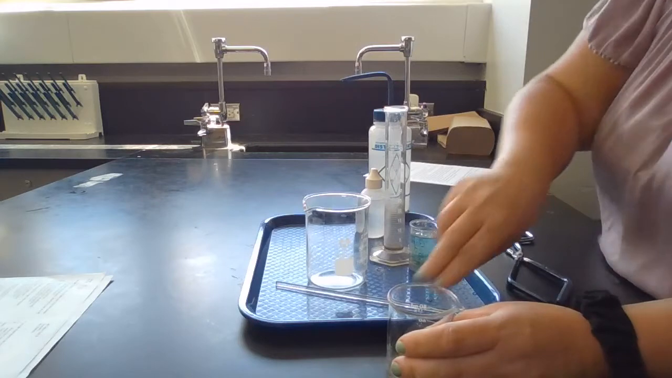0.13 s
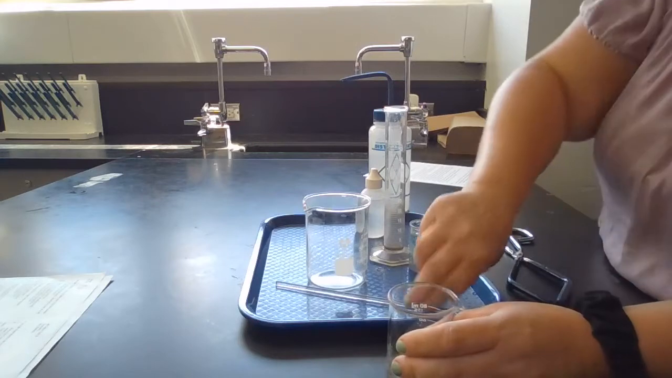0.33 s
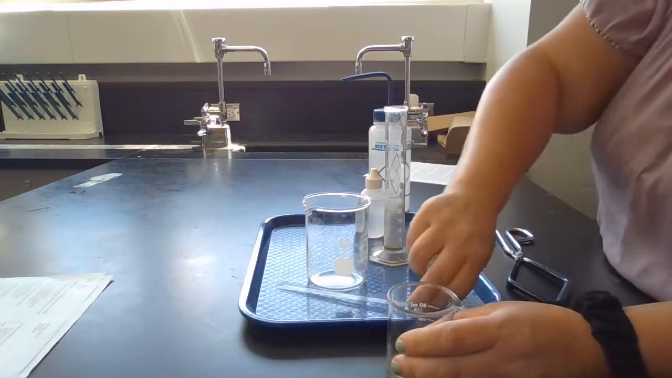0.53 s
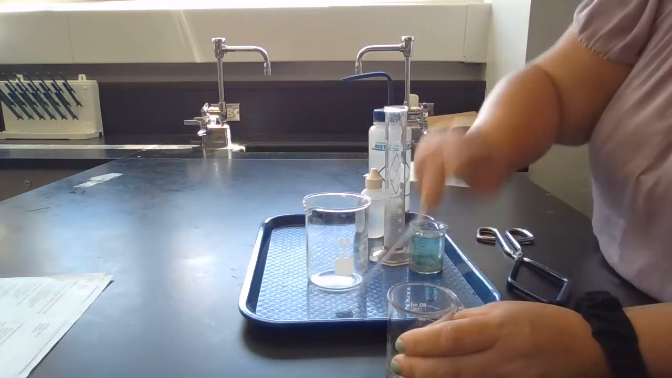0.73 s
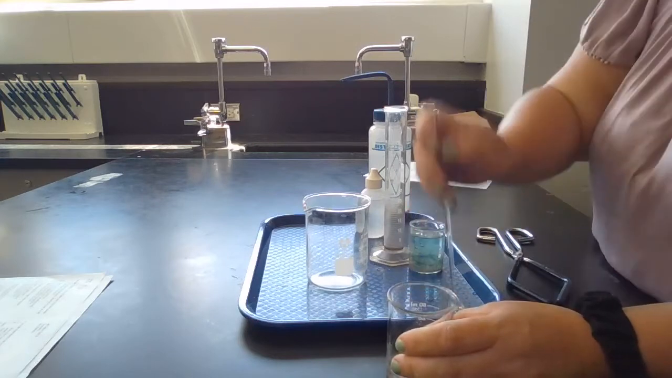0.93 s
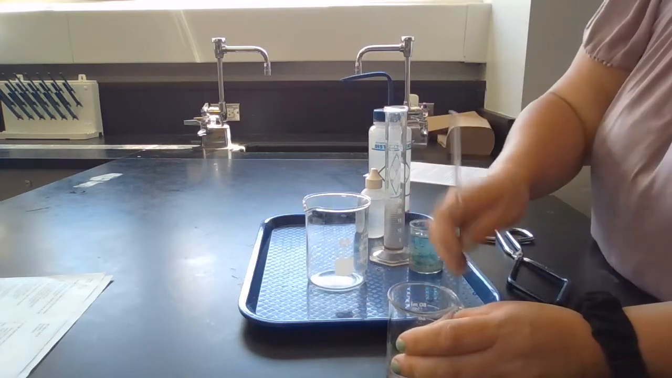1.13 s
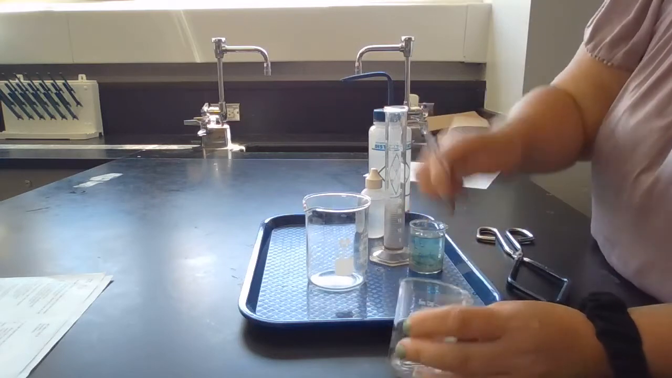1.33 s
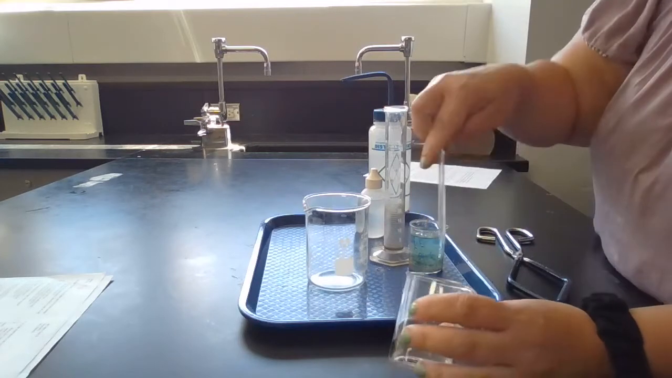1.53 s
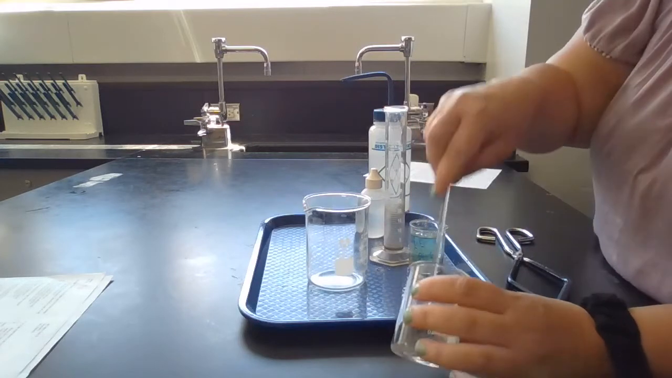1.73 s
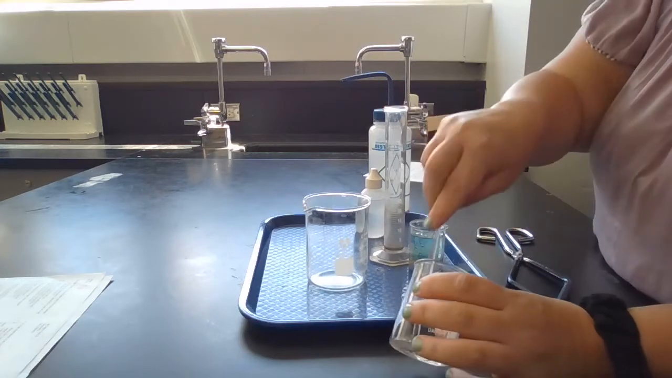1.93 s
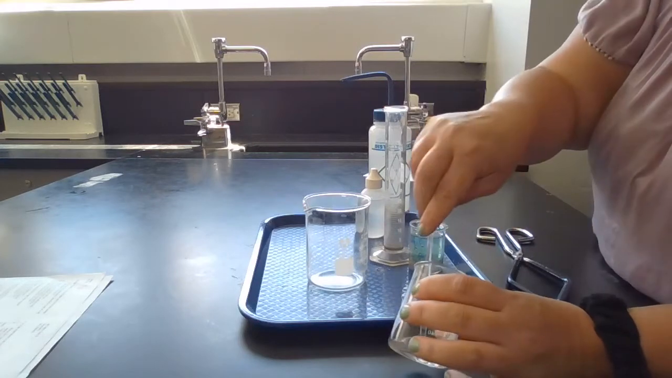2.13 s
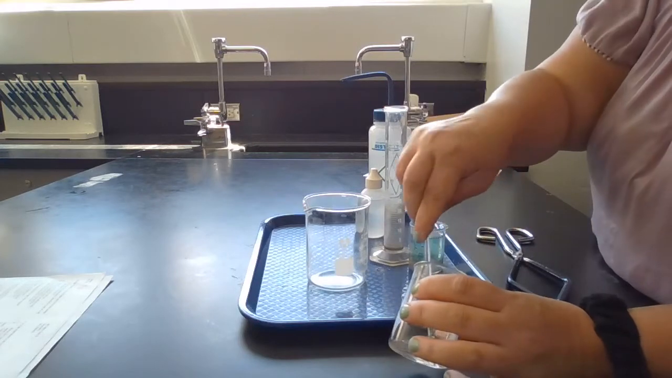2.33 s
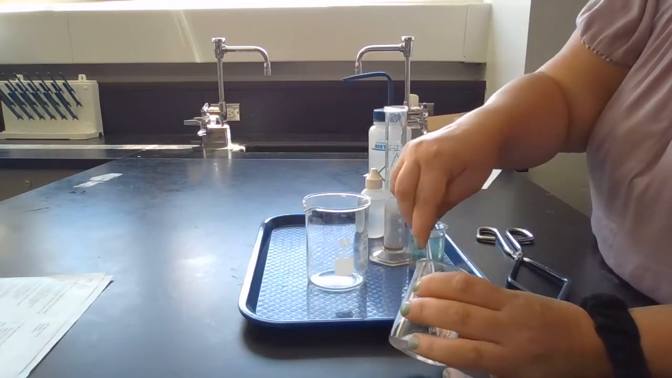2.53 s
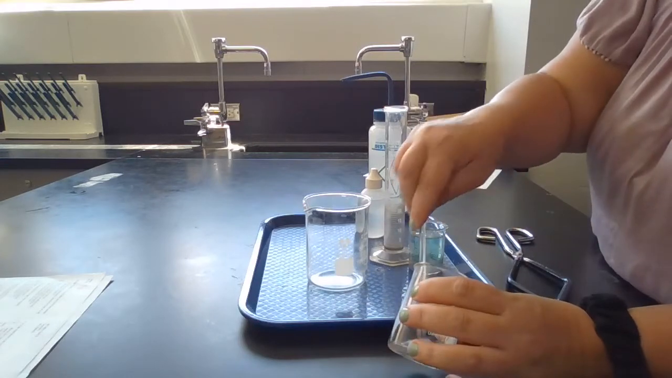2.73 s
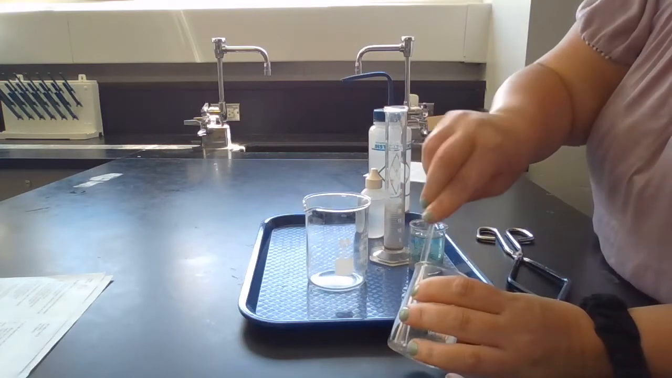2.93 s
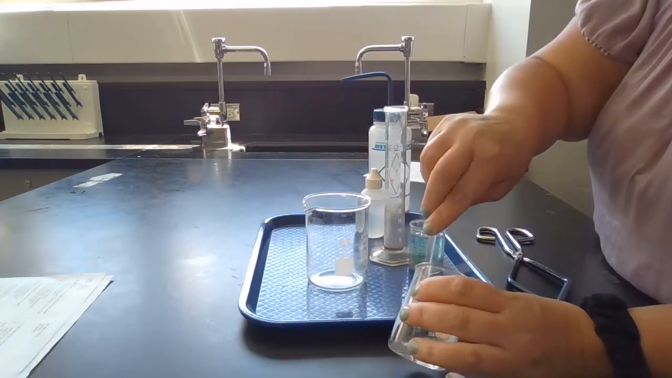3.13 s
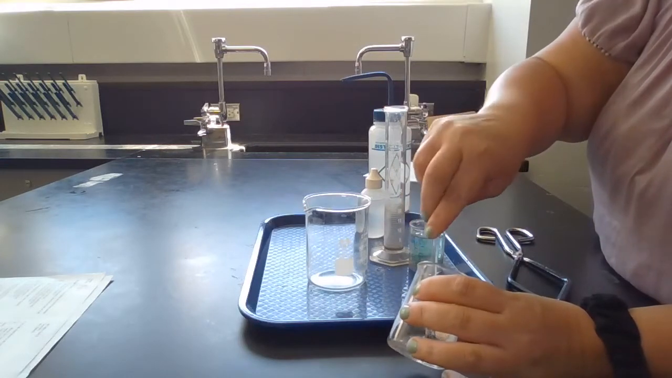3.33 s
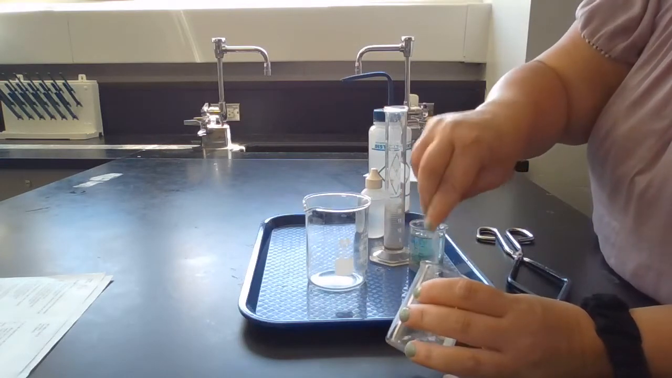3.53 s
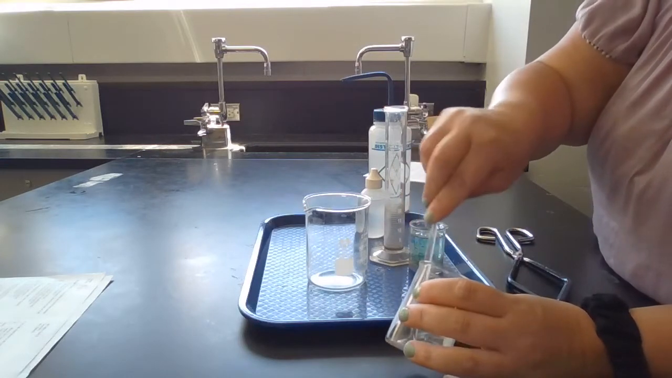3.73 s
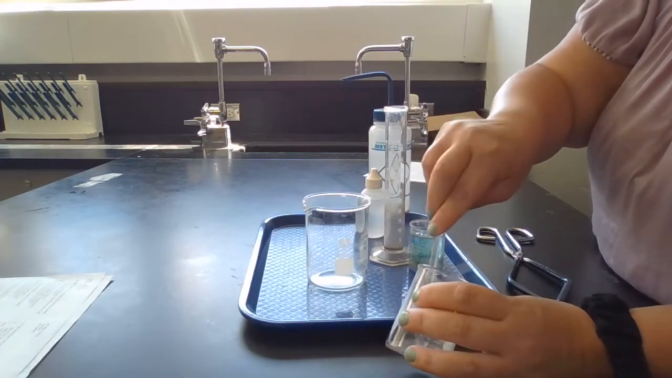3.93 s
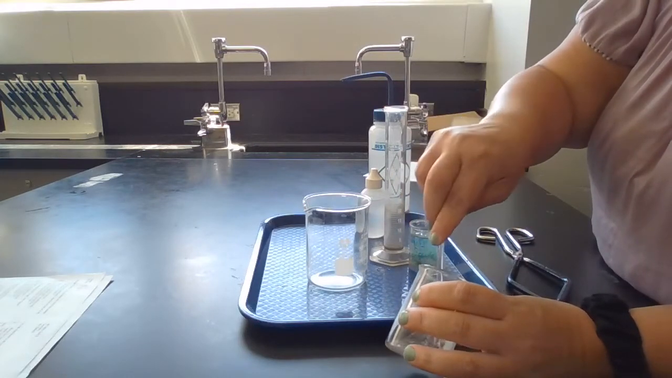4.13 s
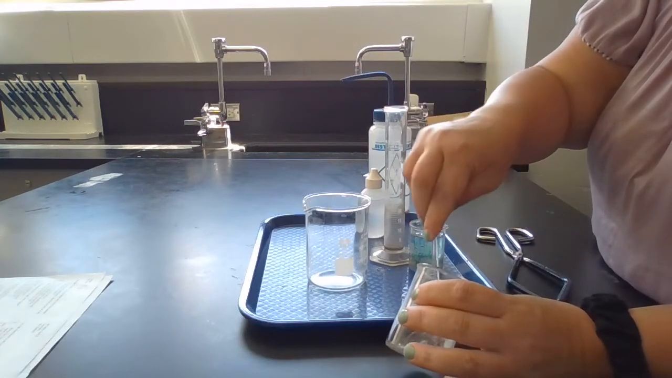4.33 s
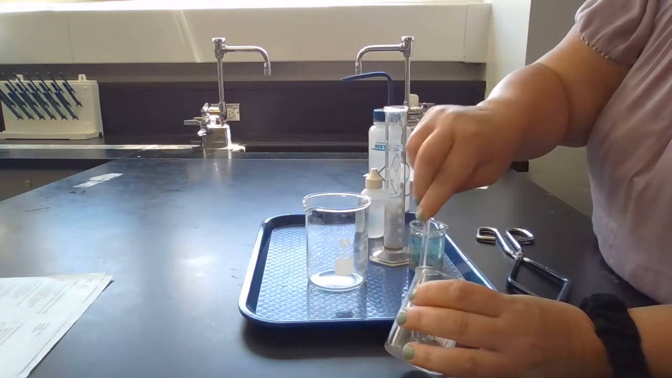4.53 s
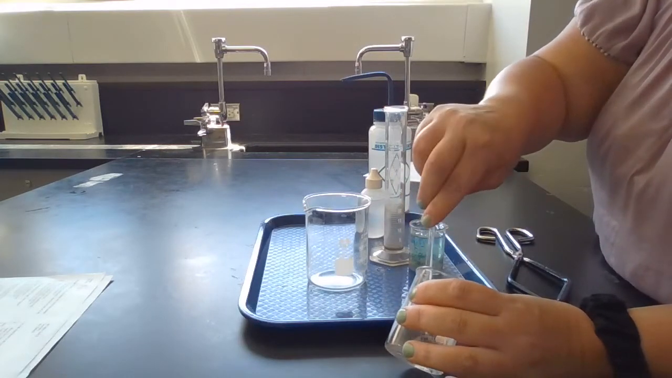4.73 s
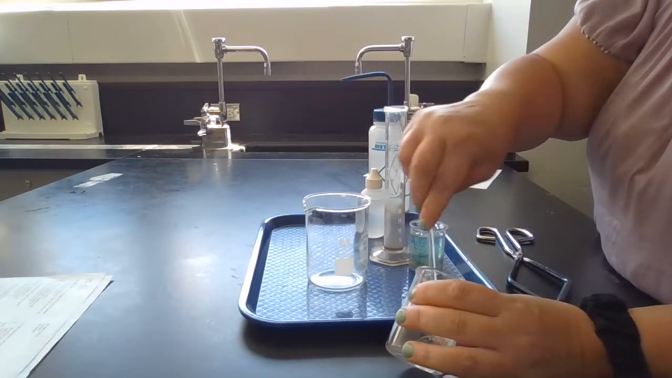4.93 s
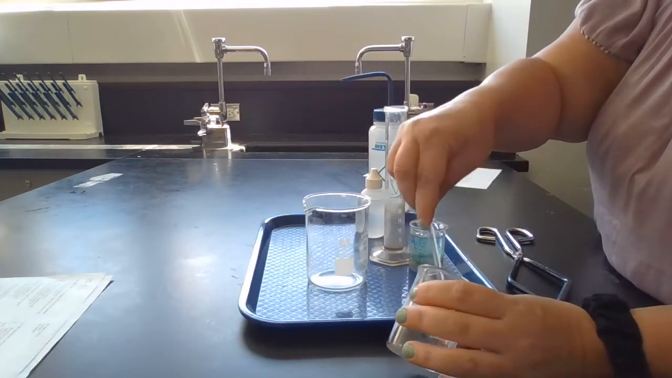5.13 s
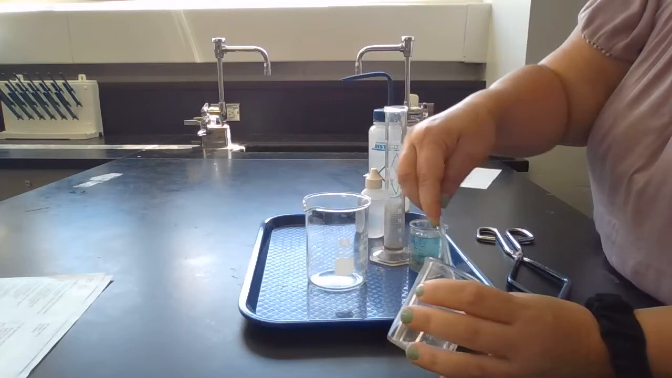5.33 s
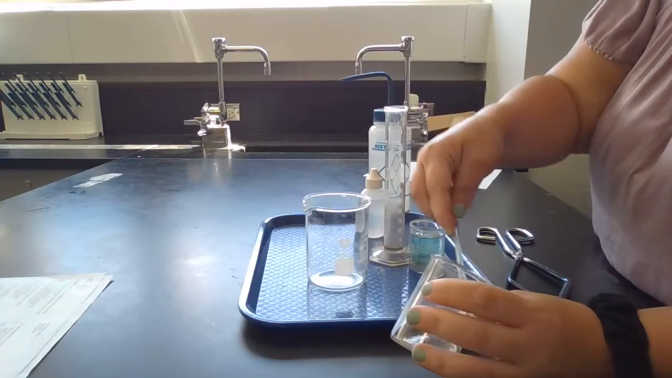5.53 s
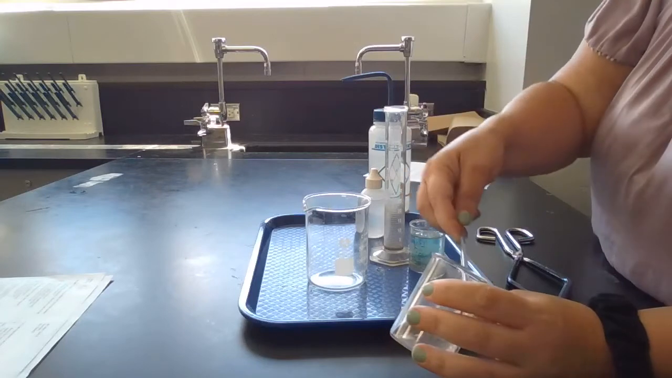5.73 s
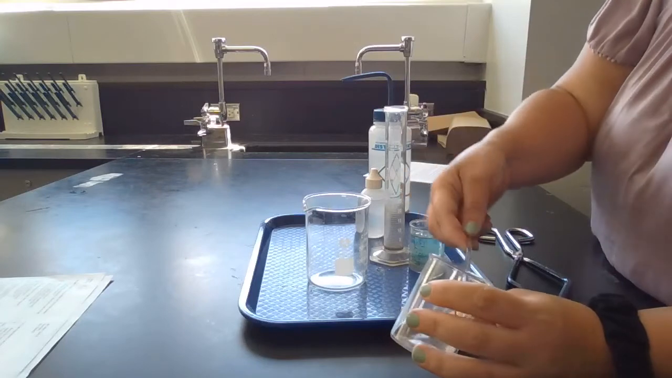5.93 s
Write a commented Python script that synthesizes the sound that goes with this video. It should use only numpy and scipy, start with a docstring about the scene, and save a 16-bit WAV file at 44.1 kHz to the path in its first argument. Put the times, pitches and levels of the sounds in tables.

```python
"""A mildly live classroom, heard from a lab bench where the ventilation hums, rumbles and hisses faintly.
A stirring rod is dragged over a ribbed plastic tray (noise grains and ringing slips) and knocks a standing
beaker (long glass modes with a crack); hard things and hands bump on the bench (low-passed bench modes).
Then the rod works in a small beaker held in the hand: clinks from modes that the fingers damp quickly,
and faint rubbing and singing from random stick-slip clicks that excite the same glass."""
import sys
import numpy as np
from scipy import signal
from scipy.fft import rfft, irfft
from scipy.io import wavfile

SR = 44100
rng = np.random.default_rng(int(sys.argv[2]) if len(sys.argv) > 2 else 0)


def persist_wave(psi):
    """Save psi, clipped to +-1, as 16-bit WAV."""
    counts = np.round(np.clip(psi, -1, 1) * 32767).astype(np.int16)
    wavfile.write(sys.argv[1], SR, np.atleast_2d(counts).T)


N = 268833
TIME = np.arange(N) / SR

# Rod touches the held beaker: (time [s], strength before sharing [dB], softness [-1 hard to 1 soft],
# spot on the glass [-1 to 1], singing rim mode [Hz])
CLINKS = [(2.0711, -41.5, 0.27, 0.93, 7010), (2.2099, -53, -0.21, 0.46, 6610),
          (2.3341, -45, 0.13, -0.39, 6500), (2.5093, -49, -0.048, -0.6, 6420),
          (2.5571, -35.5, -0.16, -0.25, 6510), (2.5828, -47, 0.38, 0.97, 6410),
          (2.6842, -51.5, 0.3, -0.4, 6370), (2.7823, -40.5, 0.11, -0.47, 6350),
          (3.059, -42, 0.68, 0.83, 6450), (3.167, -39.5, 0.051, -0.08, 6690),
          (3.2504, -43.5, 0.093, 0.24, 6470), (3.3254, -52, 0.038, -0.28, 6520),
          (3.6824, -43.5, 0.18, -0.21, 6630), (3.8978, -54.5, 0.13, 0.61, 6760),
          (3.9055, -39.5, 0.33, 0.91, 6780), (3.9539, -55, -0.88, 0.47, 6760),
          (4.0732, -50.5, -0.66, -0.1, 6220), (4.0822, -55, -0.6, -0.1, 6360),
          (4.1073, -47.5, -0.42, 0.034, 6570), (4.1301, -41, -0.1, -0.3, 6660),
          (4.1557, -58, -0.57, -0.28, 6680), (4.1673, -52, 0.19, 0.77, 6900),
          (4.2212, -63.5, 0.35, 0.1, 6700), (4.6563, -43.5, 0.2, -0.53, 6480),
          (4.7934, -50, -0.25, -0.25, 6440), (4.8134, -49.5, -0.082, -0.18, 6520),
          (5.4921, -42, 0.14, -0.15, 6510)]
# Modes of the held beaker: (frequency [Hz], relative level [dB], t60 [s])
HELD_BEAKER_MODES = [(1085, 0, .05), (1290, -8, .025), (2438, -1, .06), (2350, -3, .025), (3100, -8, .02),
                     (3985, -3, .055), (4400, 0, .018), (5000, -1, .018), (6410, 0, .035), (6500, -2, .05),
                     (6680, -4, .035), (7000, -7, .02), (7850, -14, .03), (9690, 0, .045), (10480, -2, .04),
                     (12080, -3, .025), (12430, -3, .04), (13950, -3, .04), (14300, -8, .025)]
# Bounds of the registers body, wall, rim, upper rim, shimmer: [Hz]
CLINK_EDGES_HZ = [700, 1800, 5500, 8500, 11200, 14700]
# Share of a touch in each of those registers: (level [dB], per softness [dB], per spot [dB])
CLINK_SHARES = [(-21, 3, 14), (-7, 9.5, -5.5), (-0.5, 13, -1.5), (-6.5, -11.5, -11.5), (1, -6, 4)]
# A second mode sings at this multiple of the rim mode, louder towards one spot [dB per unit of spot]
OVERTONE_RATIO, OVERTONE_SPOT_DB = 1.9, 22
# A soft contact cracks less and takes longer to pass on the blow [dB per unit of softness]
SOFT_CRACK_DB, SOFT_DELAY_DB = -2.5, 7.5

# Rod or fingers slide on the held beaker:
# (middle time [s], half length [s], level before sharing [dB], brightness [dB per register])
SLIDES = [(0.428, 0.054, -94, -14), (1.971, 0.0053, -73, 9), (2.195, 0.021, -68, -1),
          (2.444, 0.011, -69, -1.5), (2.69, 0.021, -68, 0), (3.187, 0.02, -59, -0.5),
          (3.286, 0.013, -69.5, -7), (3.496, 0.0098, -91, -17), (3.507, 0.012, -81, 10),
          (3.571, 0.0083, -87, 9), (3.983, 0.0073, -66, -2), (4.127, 0.028, -60.5, -0.5),
          (4.215, 0.015, -63, 0.5), (4.768, 0.022, -76.5, -5.5), (4.804, 0.0079, -62, 2),
          (4.907, 0.014, -74, -7), (5.031, 0.013, -72.5, 3.5), (5.115, 0.017, -73, 2.5),
          (5.21, 0.0087, -78.5, 1), (5.372, 0.013, -64.5, 3), (5.467, 0.025, -72.5, 2),
          (5.556, .021, -71, -1), (5.748, 0.014, -67.5, -2.5), (6.08, 0.041, -78, -4.5)]
# Bounds of the sliding registers body, wall, rim, shimmer: [Hz]
SLIDE_EDGES_HZ = [700, 1800, 5500, 8500, 16000]
# Share of a slide in each of those registers: [dB]
SLIDE_SHARE_DB = [-14.5, -10, -1, -2]
# Sliding rod locks on to a wall mode: (middle time [s], half length [s], level [dB])
SINGS = [(2.815, 0.022, -57.5), (2.933, 0.011, -66.5), (4.803, 0.011, -57), (5.046, 0.013, -71.5),
         (5.103, 0.0114, -78.5), (5.34, 0.057, -82), (5.442, 0.031, -84)]
SING_HZ, SING_WIDTH_HZ = 2392, 46

# Rod on the standing beaker, with its bounces: (time [s], level before crack and ring offsets [dB])
STRIKES = [(.6631, -20), (.6861, -31), (.6965, -40)]
# Modes of the standing beaker: (frequency [Hz], relative level [dB], full-length t60 [s])
STANDING_BEAKER_MODES = [(1360.7, -35, 1.9), (1373.2, -35, 1.9), (2560, -17, .16), (2762, -26, .25),
                         (3666, -31, .3), (6680, -16, .18), (6865, -17, .28), (7897, -17, .21),
                         (7980, -17, .17), (10880, -25, .22), (12823, -4.5, .18), (13054, -16, .19),
                         (13183, -15, .12), (14450, 0, .125), (14753, -3, .12), (15021, -3, .11),
                         (15542, -10, .08)]
# Colour of the crack on that beaker: (frequency [Hz], relative level per Hz [dB])
STRIKE_COLOUR = [(200, -28), (1000, -13), (2600, -2), (4500, -8), (6500, -2), (8000, -7), (9000, -20),
                 (10100, -20), (11000, 0), (13700, -2), (14700, 6), (16000, -5)]
# Modes of the tray under it: (frequency [Hz], relative level [dB], t60 [s])
TRAY_MODES = [(89, 8, 0.078), (187, -4, 0.092), (324, 12, 0.0089), (603.3, -13, 0.067), (1210, -3, 0.1)]

# Strokes of the rod over the tray: (start time [s], length [s], level [dB])
STROKES = [(0, 0.028, -65), (0.09, 0.049, -56.5), (0.439, 0.0076, -65.5), (0.484, .02, -55.5),
           (0.576, 0.011, -64.5), (0.627, 0.11, -49.5), (0.758, 0.025, -48.5)]
STROKE_ATTACK_S, STROKE_T60_S = .004, 0.15
# Rod catches hard on a rib of the tray: (time [s], level [dB])
SLIPS = [(.5075, -47.5), (0.6426, -44.5), (0.6482, -39), (.6779, -37), (.7781, -48), (0.788, -39),
         (0.7998, -44)]
# Colour of rod on plastic: (frequency [Hz], relative level per Hz [dB])
SCRAPE_COLOUR = [(100, -25), (450, -13), (850, -17), (1200, -5), (1600, -7), (2100, -3), (2650, 4),
                 (3200, -2), (4200, -4), (6500, -6), (8500, -19), (15000, -20)]
# Modes of the glass rod at each catch: (frequency [Hz], relative level [dB], t60 [s])
ROD_MODES = [(2660, -4, 0.094), (2871, 1, 0.057), (5730, -17.5, 0.081), (6800, -15.5, 0.059),
             (8000, -34.5, 0.3)]

# Knocks on the bench: (time [s], level [dB], contact cut-off [Hz])
KNOCKS = [(1.0402, -25.5, 13900), (1.2368, -55.5, 2470), (1.2467, -48, 2950), (1.2505, -48, 4160),
          (1.2657, -48, 2196), (1.2726, -56.5, 2420)]
# Bench modes under the knocks: (frequency [Hz], relative level [dB], t60 [s])
KNOCK_MODES = [(323, -19, .22), (500, -8, .11), (1155, -4, .07), (2000, 1, .07), (2585, -2, .075),
               (2690, -6, .07), (3140, -11, .07), (3705, -8, .08), (3920, -6, .06), (4270, 1, .065),
               (4570, -4, .07)]
# Colour of the knocks' crack: (frequency [Hz], relative level per Hz [dB])
KNOCK_COLOUR = [(80, -30), (200, -9), (550, -8), (850, -11), (1150, -3), (1450, -17), (1750, -7), (2100, 1),
                (3000, -3), (4500, 0), (5800, -10), (7000, -11), (8500, -22), (15000, -21)]
# Dull bumps of hands and glassware: (time [s], level [dB], contact cut-off [Hz])
BUMPS = [(.008, -57.5, 227), (0.101, -58.5, 1950), (0.283, -56.5, 110), (1.51, -66, 143), (2.207, -61, 130),
         (4.186, -54, 198), (4.898, -44.5, 2580), (5.235, -82, 127.3)]
# Bench-top modes under the bumps: (frequency [Hz], relative level [dB], t60 [s])
BUMP_MODES = [(105, -33, .2), (165, -25, .22), (458, -13, .11), (560, -13, .08), (680, -18, .16),
              (1120, 0, .08), (1250, -2, .06), (1550, -3, .05), (1780, -4, .05), (2440, -2, .055),
              (2900, -6, .035)]

# Colour of the ventilation rumble: (frequency [Hz], relative level per Hz [dB])
RUMBLE_COLOUR = [(18, -58), (30, -30), (69, -14.5), (84, -7), (102, 3), (130, -10), (199, -9), (502, -29.5),
                 (579, -30.5), (900, -52.5), (1170, -76.5), (1980, -120)]
# Level of the rumble over time: (time [s], level [dB])
RUMBLE_LEVEL = [(0.0, -60), (0.39, -68), (2.0, -69.5), (2.82, -65), (3.28, -69.5), (4.28, -62),
                (4.5, -66.5), (6.1, -66.5)]
HUM_HZ, HUM_DB = 99.2, -70
# Colour of the steady hiss: (frequency [Hz], relative level per Hz [dB])
HISS_COLOUR = [(300, 2.5), (1000, 2), (2500, -3), (6500, -4.5), (8000, -14.5), (15000, -10)]
HISS_DB = -85

# Decay of the classroom: (frequency [Hz], t60 [s])
ROOM_T60 = [(200, 0.67), (1000, 0.13), (2300, 0.21), (4500, 0.32), (8000, 0.11), (15000, 0.22)]
CUTOFF_HZ = 16100


def from_db(db):
    """Decibels to gain."""
    return 10 ** (np.asarray(db) / 20)


def rms_one(x):
    """Scale to rms 1."""
    return x / np.sqrt(np.mean(x ** 2) + 1e-20)


def attack_one(x, size=353):
    """Scale so that the first samples (8 ms by default) have rms 1."""
    return x / np.sqrt(np.mean(x[:size] ** 2) + 1e-20)


def gain_curve(rows):
    """Gain over time from rows (time [s], level [dB])."""
    return from_db(np.interp(TIME, *np.transpose(rows)))


def at_hz(points, hz):
    """Read a table on a log-frequency axis."""
    known, values = np.transpose(points)
    return np.interp(np.log(np.maximum(hz, 1)), np.log(known), values)


def butter(x, hz, kind, order=2):
    """Causal Butterworth filter."""
    sos = signal.butter(order, np.clip(hz, 10, .45 * SR), kind, fs=SR, output="sos")
    return signal.sosfilt(sos, x)


def noise(colour, size):
    """Noise of a given spectrum, rms 1."""
    hz = np.fft.rfftfreq(size, 1 / SR)
    spectrum = rfft(rng.standard_normal(size)) * from_db(at_hz(colour, hz))
    return rms_one(irfft(spectrum, size))


def fade(t60, size):
    """Exponential decay by 60 dB in t60 seconds."""
    return from_db(-60 * TIME[:size] / t60)


def ring(modes, size, spread_db, detune=0, length=1):
    """Struck modes as decaying sines of randomly varied strength; successive pairs alternate in sign."""
    out = np.zeros(size)
    for k, (hz, db, t60) in enumerate(modes):
        strength = from_db(db + spread_db * rng.standard_normal()) * (-1) ** (k // 2)
        pitch = hz * (1 + detune * rng.standard_normal())
        out += strength * np.sin(2 * np.pi * pitch * TIME[:size]) * fade(t60 * length, size)
    return out


def add(track, s, sound):
    """Mix a sound in at a time in seconds."""
    start = max(round(s * SR), 0)
    track[start:start + len(sound)] += sound[:N - start]


def friction(per_s, spread_db):
    """Stick and slip: random clicks of uneven size, rms 1."""
    sizes = from_db(spread_db * np.clip(rng.standard_normal(N), -2, 2)) * rng.choice([-1, 1], N)
    happens = rng.random(N) < per_s / SR
    return rms_one(sizes * happens)


def swell(s, half):
    """Bell-shaped rise and fall of a slide around its middle."""
    return np.exp(-.5 * ((TIME - s) / half) ** 2)


def clinks(crack_db=-7, crack_t60=0.033, singing_db=5, singing_t60=0.054, contact_s=0.00025, size=8000):
    """Touches ring the held glass over a crack; softness and spot set the balance, grip shifts the pitch."""
    out = np.zeros(N)
    for s, strength_db, softness, spot, rim_hz in CLINKS:
        levels = strength_db + np.array(CLINK_SHARES) @ [1, softness, spot]
        # The glass takes a moment to pick up the blow
        delay_s = contact_s * from_db(SOFT_DELAY_DB * softness)
        onset = 1 - np.exp(-TIME[:size] / delay_s)
        rim = (rim_hz, singing_db, singing_t60)
        overtone = (OVERTONE_RATIO * rim_hz, OVERTONE_SPOT_DB * spot, singing_t60)
        glass = list(HELD_BEAKER_MODES) + [rim, overtone]
        crack_gain = from_db(crack_db + SOFT_CRACK_DB * softness)
        for db, low, high in zip(levels, CLINK_EDGES_HZ, CLINK_EDGES_HZ[1:]):
            modes = [mode for mode in glass if low <= mode[0] < high]
            tone = butter(ring(modes, size, spread_db=4, detune=.006), [low, high], "band", order=1)
            burst = rng.standard_normal(size) * fade(crack_t60, size)
            crack = butter(burst, [low, high], "band", order=3)
            struck = attack_one(tone) + crack_gain * attack_one(crack)
            add(out, s, from_db(db) * attack_one(struck * onset))
    return out


def rubbing(size=5000):
    """Sliding excites the held glass with tiny random slips that swell and fade."""
    out = np.zeros(N)
    registers = zip(SLIDE_SHARE_DB, SLIDE_EDGES_HZ, SLIDE_EDGES_HZ[1:])
    for k, (share_db, low, high) in enumerate(registers):
        modes = [mode for mode in HELD_BEAKER_MODES if low <= mode[0] < high]
        glass = butter(ring(modes, size, spread_db=0), low, "high")
        # Brightness tilts the registers about the rim (k = 2)
        pressure = sum(from_db(db + share_db + brightness * (k - 2)) * swell(s, half)
                       for s, half, db, brightness in SLIDES)
        slips = friction(per_s=1500, spread_db=12)
        out += pressure * rms_one(signal.fftconvolve(slips, glass)[:N])
    return out


def singing():
    """Stick and slip, narrowed to one wall mode of the glass, keeps it going unsteadily."""
    pressure = sum(from_db(db) * swell(s, half) for s, half, db in SINGS)
    band = [SING_HZ - SING_WIDTH_HZ / 2, SING_HZ + SING_WIDTH_HZ / 2]
    return pressure * rms_one(butter(friction(per_s=3900, spread_db=1), band, "band"))


def standing_beaker(crack_db=3, crack_t60=.014, ring_db=-5, bounce_db=-3, thump_db=-16.5, size=80000):
    """The free glass rings long, its split lowest mode beating; bounces ring briefly; the tray thumps."""
    out = np.zeros(N)
    for s, db in STRIKES:
        crack = butter(noise(STRIKE_COLOUR, size) * fade(crack_t60, size), 800, "high")
        add(out, s, from_db(db + crack_db) * crack)
    for s, db in STRIKES[1:]:
        bounce = ring(STANDING_BEAKER_MODES, size, spread_db=2, detune=.004, length=.25)
        add(out, s, from_db(db + bounce_db) * bounce)
    s, db = STRIKES[0]
    add(out, s, from_db(db + ring_db) * ring(STANDING_BEAKER_MODES, size, spread_db=0))
    thump = butter(ring(TRAY_MODES, size, spread_db=0), 65, "high")
    add(out, s, from_db(db + thump_db) * thump)
    return out


def stroke(start, length):
    """One stroke bites quickly, holds, and dies away after the rod lets go."""
    attack = np.clip((TIME - start) / STROKE_ATTACK_S, 0, 1)
    return attack * from_db(-60 * np.maximum(TIME - start - length, 0) / STROKE_T60_S)


def tray_scrape(slip_t60=0.02, grain_t60=0.03, rod_db=-7, size=8192):
    """The rod rattles over ribbed plastic: single ringing slips on a grain of many tiny noise bursts."""
    # Burst powers add up, so the envelope is the root of their sum
    slip_power = friction(per_s=480, spread_db=3.5) ** 2
    grain_power = signal.fftconvolve(slip_power, fade(grain_t60, size) ** 2)[:N]
    grain = rms_one(np.sqrt(np.abs(grain_power)) * noise(SCRAPE_COLOUR, N))
    out = grain * sum(from_db(db) * stroke(s, length) for s, length, db in STROKES)
    for s, db in SLIPS:
        tick = attack_one(noise(SCRAPE_COLOUR, size) * fade(slip_t60, size), size=132)
        rod = attack_one(ring(ROD_MODES, size, spread_db=4.5))
        add(out, s, from_db(db) * (tick + from_db(rod_db) * rod))
    return out


def knocks(crack_db=6, crack_t60=0.06, rattle_db=-3, rattle_t60=0.059, bright_db=-22, size=16384):
    """Blows crack, rattle and ring the bench; a softer contact cuts their top, under a little bright grit."""
    out = np.zeros(N)
    for s, db, contact_hz in KNOCKS:
        crack_shape = from_db(crack_db) * attack_one(fade(crack_t60, size))
        rattle_shape = from_db(rattle_db) * fade(rattle_t60, size)
        burst = noise(KNOCK_COLOUR, size) * (crack_shape + rattle_shape)
        blow = burst + attack_one(ring(KNOCK_MODES, size, spread_db=1))
        grit = butter(rng.standard_normal(size), 6000, "high") * fade(rattle_t60, size)
        contact = attack_one(butter(blow, contact_hz, "low"))
        add(out, s, from_db(db) * (contact + from_db(bright_db) * grit))
    return butter(out, 170, "high", order=3)


def bumps(thud_db=-3, thud_t60=0.071, size=16384):
    """Bench-top modes and a thud of noise; the softer the contact, the lower its cut-off."""
    out = np.zeros(N)
    for s, db, contact_hz in BUMPS:
        burst = butter(rng.standard_normal(size), [1000, 3000], "band")
        thud = attack_one(burst * fade(thud_t60, size))
        blow = attack_one(ring(BUMP_MODES, size, spread_db=1)) + from_db(thud_db) * thud
        dulled = butter(blow, contact_hz, "low", order=4)
        add(out, s, from_db(db) * attack_one(dulled, size=700))
    return out


def room(x, gap_s=0.0019, size=24000):
    """Diffuse echoes: bands of noise, each with its own decay, building up after a short gap."""
    edges = np.geomspace(125, 19000, 8)
    tail = np.zeros(size)
    for low, high in zip(edges, edges[1:]):
        t60 = at_hz(ROOM_T60, np.sqrt(low * high))
        tail += butter(rng.standard_normal(size), [low, high], "band") * fade(t60, size)
    tail = tail * np.clip(TIME[:size] / gap_s - 1, 0, 1)
    return signal.fftconvolve(x, tail / np.sqrt(np.sum(tail ** 2)))[:N]


def ventilation(waver=0.18):
    """Duct rumble and air hiss as coloured noise, and a fan's hum with a slightly unsteady level."""
    sway = rms_one(butter(rng.standard_normal(N), 4, "low"))
    hum = np.sqrt(2) * np.sin(2 * np.pi * HUM_HZ * TIME) * (1 + waver * sway)
    rumble = gain_curve(RUMBLE_LEVEL) * noise(RUMBLE_COLOUR, N)
    hiss = from_db(HISS_DB) * noise(HISS_COLOUR, N)
    return from_db(HUM_DB) * hum + rumble + hiss


def scene():
    """Held beaker, tray and bench heard directly and through the room; the bench sends most to the echoes."""
    held = clinks() + rubbing() + singing()
    tray = standing_beaker() + tray_scrape()
    bench = knocks() + bumps()
    echoes = room(from_db(-15) * held + from_db(-16) * tray + from_db(-10.5) * bench)
    return (held + tray + bench + echoes + ventilation())[None, :]


def record(dry):
    """One microphone channel rolls off the deep bass; the top is cut steeply."""
    thinned = butter(dry, 22, "high")
    top_cut = signal.ellip(10, .1, 80, CUTOFF_HZ, fs=SR, output="sos")
    return signal.sosfilt(top_cut, thinned)


dry = scene()
out = record(dry)
persist_wave(out)
```